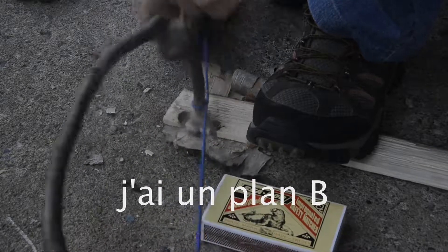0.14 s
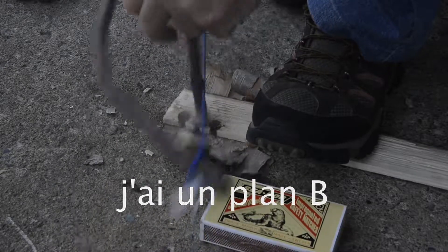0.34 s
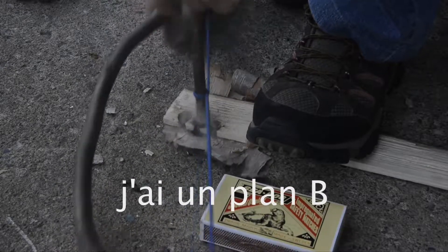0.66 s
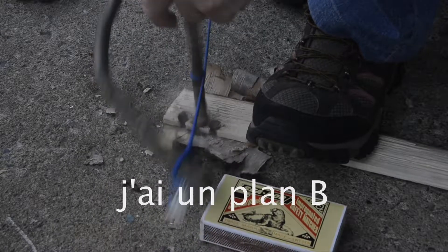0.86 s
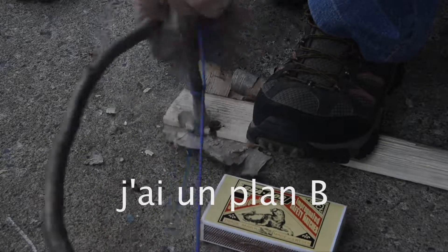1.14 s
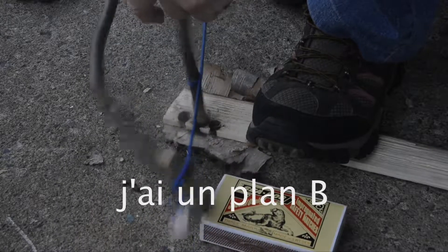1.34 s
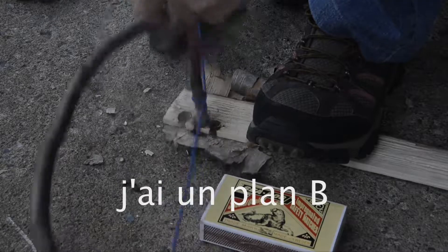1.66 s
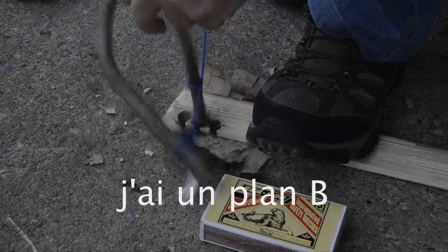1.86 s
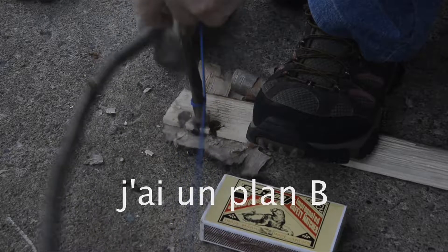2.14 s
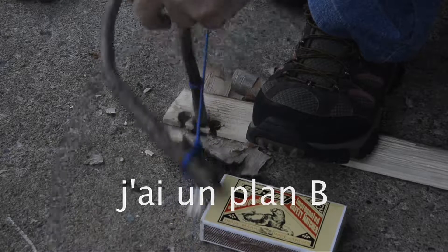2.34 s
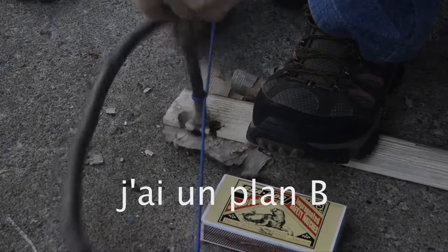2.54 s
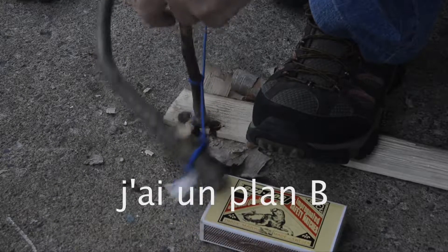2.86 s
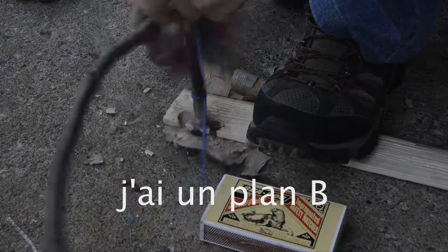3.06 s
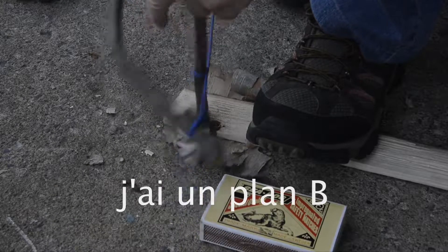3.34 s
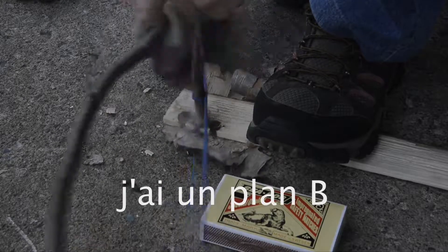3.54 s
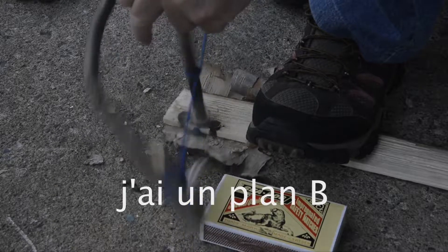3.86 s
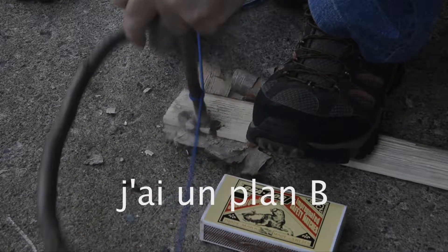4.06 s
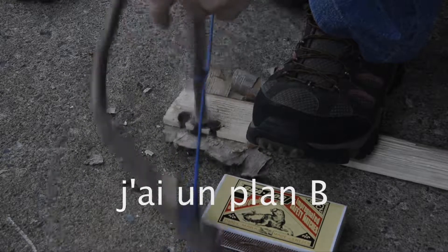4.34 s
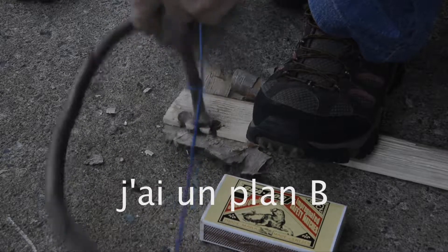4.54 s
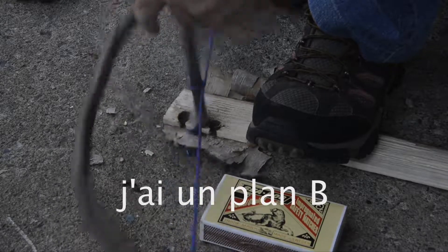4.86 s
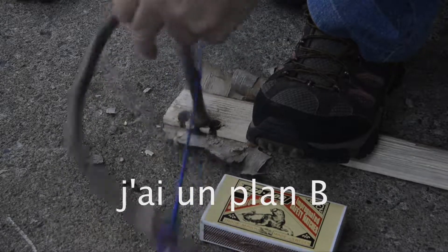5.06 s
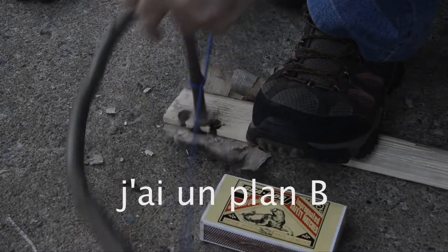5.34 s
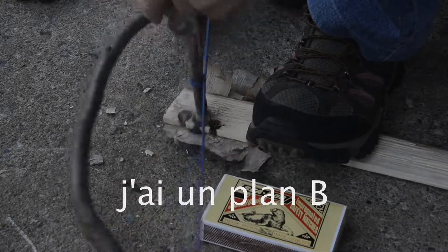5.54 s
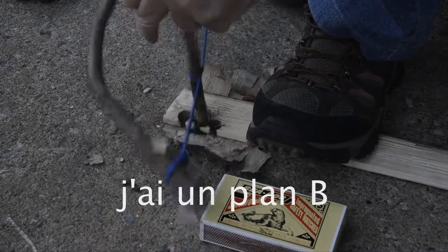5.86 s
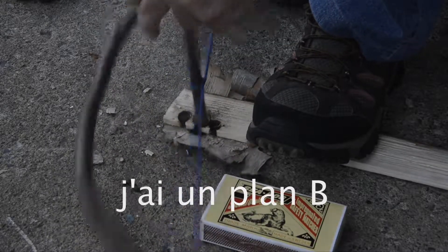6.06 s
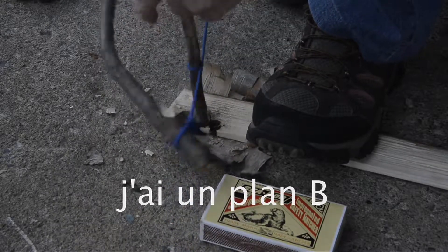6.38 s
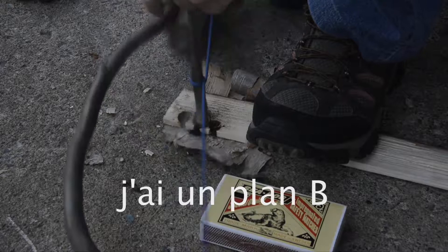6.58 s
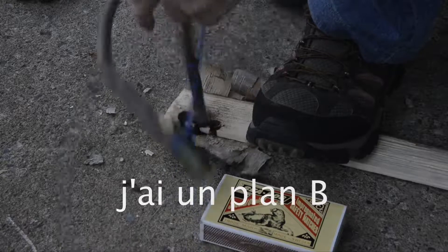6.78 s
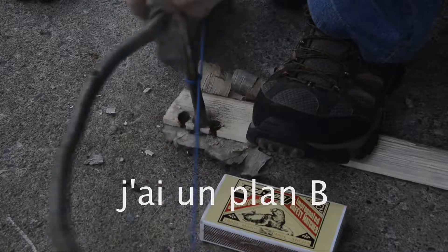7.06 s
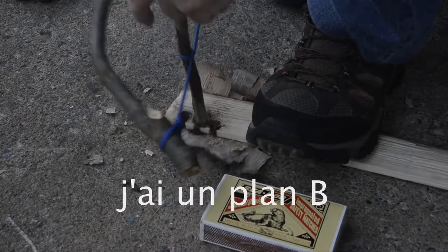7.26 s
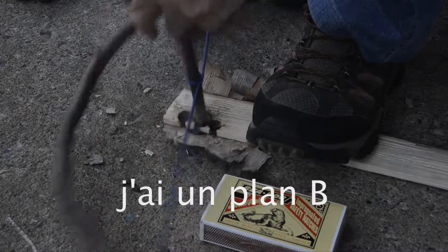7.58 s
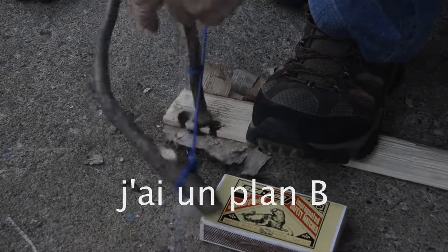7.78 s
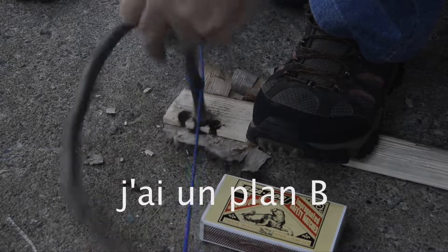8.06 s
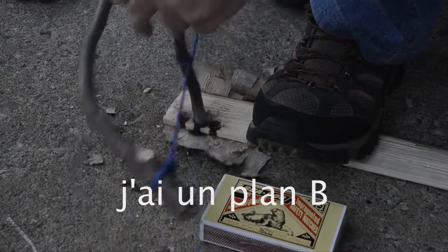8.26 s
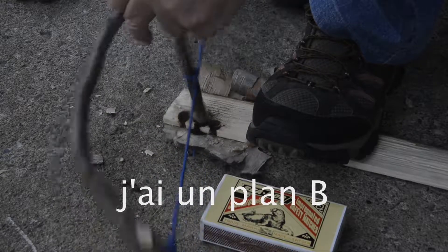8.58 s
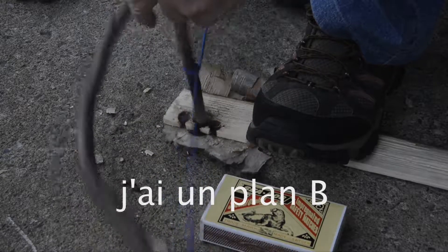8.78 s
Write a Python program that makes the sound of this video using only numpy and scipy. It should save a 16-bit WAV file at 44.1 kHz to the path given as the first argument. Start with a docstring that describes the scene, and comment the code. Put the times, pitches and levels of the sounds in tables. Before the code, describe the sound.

A corded bow spins a wooden spindle in a board, rasping to and fro four times a second, with sharp chattering squeaks at each reversal, outdoors.

```python
"""Bow drill outdoors: smooth noise and low tones lie throughout; a wooden spindle grinds to and fro in a board.
Each reversal breaks loose in chattering noise bursts; many also squeak, a harmonic stack of even slips.
Soft scuffs of filtered grit come now and then as the board shifts; in five strokes the tip sings, a tone
flaring per turn. Past mid-scene the bow knocks the board twice, a sharp jolt and a rattle through the
ground resonances. Gain ducking, rounded peaks and a top cut shape the sum."""
import sys
import numpy as np
from scipy import signal
from scipy.fft import rfft, irfft
from scipy.io import wavfile

SR = 44100
rng = np.random.default_rng(int(sys.argv[2]) if len(sys.argv) > 2 else 0)


def store_pcm(level_fs):
    """Save levels as 16-bit WAV."""
    pcm = np.round(np.clip(level_fs, -1, 1) * 32767).astype(np.int16)
    wavfile.write(sys.argv[1], SR, np.atleast_2d(pcm).T)


N = 393372

# Source levels are nominal: before random swells and record().
# far-noise spectrum: freq_hz, relative_db
OUTDOORS_SPECTRUM = [(25, -31), (60, -5), (2400, -4.5), (3200, -19.5), (6500, -12.5), (16000, -27)]
OUTDOORS_DB = -41   # rms
# low tones: centre_hz, width_hz, level_db (before swell)
HUM = [(59.5, 8.3, -69.5), (79, 5, -60.5), (361.7, 4.6, -66.5)]
# hum gain over time: time_s, gain_db
HUM_SWELL = [(5.3, 5.5), (7.0, 10), (8.1, 10.5), (8.4, -13.5)]
# grind through one stroke, slowing to a halt: stroke_share (0-1), gain_db
STROKE_SHAPE = [(0.02, -12), (.15, -6), (.7, -1.4), (.92, -8.5), (.99, -14.5)]
# bearing pressure, read at stroke starts: time_s, grind_level_db (before push/pull offset and settling)
PRESSURE = [(0, -22), (.15, -30.5), (.4, -34), (.5, -27.5), (3.3, -24.5), (5.17, -28), (5.41, -42),
            (5.57, -31), (5.93, -24), (8.9, -28)]
# spindle and board resonances: centre_hz, width_hz, grind_relative_db, chatter_relative_db
WOOD = [(1150, 320, -12, -14), (2050, 520, -9.5, -8), (2814, 220, -2.5, 0.7), (3521, 296, -3, -0.5),
        (4620, 810, -10.5, -7), (6194, 522, -13, 3), (6920, 1050, -8.5, -19), (8095, 1156, -14, -2),
        (9394, 904, -14.5, -5), (11450, 2520, -21, -6), (15450, 3200, -25, -17)]
# bow reversals, pull and push in turn: start_s, break_loose_ms, level_db, [wait_ms after a short catch]
REVERSALS = [(0.005, 6.2, -33), (0.151, 15, -10, 13), (0.387, 12.3, -13.5, 9.5), (0.510, 5, -47),
             (0.655, 26, -9), (0.912, 13, -20, 21), (1.147, 9.3, -12, 13), (1.402, 13.4, -9, 17),
             (1.597, 40.5, -7.5), (1.888, 10, -14, 12.5), (2.118, 12.3, -10.5, 12.5),
             (2.362, 12, -12.5, 17.5), (2.572, 13, -12.5, 20.5), (2.819, 26, -12.5, 18), (3.045, 25, -11.5),
             (3.297, 25, -10.5), (3.534, 17, -8), (3.772, 14, -14, 15), (4.0, 13.2, -11, 16.5),
             (4.217, 80, -7), (4.474, 16.3, -11, 16), (4.691, 35, -12, 13.5), (4.94, 15.4, -8),
             (5.165, 29, -12.5, 17), (5.414, 13, -17.5), (5.518, 30, -14), (5.577, 38, -12),
             (5.939, 8.7, -17.5), (6.134, 30, -11.5), (6.381, 26.7, -10.5), (6.604, 21.3, -7.5),
             (6.823, 24, -11.5), (7.052, 19.4, -9.5, 11), (7.261, 71, -10.5), (7.489, 18.2, -14.5),
             (7.757, 13.5, -14, 12.5), (7.966, 16.8, -11.5), (8.173, 56, -11.5, 47),
             (8.424, 22.3, -9.5, 13.5), (8.657, 28, -9), (8.894, 22.2, -8.5)]
# regular stick-slip: start_s, length_ms, level_db, slip_rate_hz, overtone_gain_db, [climb_hz by length_ms]
SQUEAKS = [(0.170, 15, -11, 2576, -12), (0.657, 12, -12, 2620, -15), (0.931, 19, -11.5, 3150, -1),
           (1.164, 15, -10, 3136, 22), (1.43, 12.6, -12, 3200, 2, 150), (1.906, 15, -10, 3640, -7),
           (2.142, 15, -6, 3000, 22, -110), (2.385, 18, -14, 3100, 14), (2.573, 15, -7.5, 3534, 3.5, -110),
           (2.604, 27, -13.5, 3470, -2), (3.323, 46, -17.5, 3208, -22), (3.534, 5.2, -6.5, 3100, 13),
           (3.774, 6.4, -12, 3270, 6), (3.795, 17, -13.5, 3790, -0.5), (4.016, 11.3, -8.5, 3170, 1, 197),
           (4.211, 16, -15, 3090, -5.5), (4.473, 9, -9, 3560, 1, -150), (4.748, 17.4, -6.5, 3095, 5),
           (4.958, 12.1, -5, 3245, 2, -150), (5.212, 26, -6.5, 3107, 11, -90),
           (6.132, 13.3, -9.5, 2950, -8), (6.415, 33, -10, 3425, 0), (6.626, 14, -14, 2780, -20),
           (6.851, 25.5, -11.5, 3545, -2.5), (7.056, 7.8, -8.5, 3530, 0), (7.324, 14, -14, 3700, -12),
           (7.504, 18, -9.5, 3395, 8, -220), (7.524, 16, -17.5, 2600, -24), (8.427, 6.87, -9, 3260, 9),
           (8.466, 34, -11, 3047, 0.5, 408), (8.685, 30, -10, 3110, 10.5, 440),
           (8.893, 11.5, -13, 3306, 7, -130)]
# board shifting on the ground: centre_s, width_ms, level_db
SCUFFS = [(0.268, 62, -27.5), (2.08, 66, -26), (3.639, 36, -25), (3.958, 44, -23.5), (5.048, 39, -26.5),
          (7.18, 46, -27), (7.394, 20, -25), (7.468, 16, -25.5), (2.24, 35, -29), (8.081, 62, -27)]
# bow hitting the board: start_s, sharp_part_db
KNOCKS = [(5.287, -20), (5.3118, -7.5)]
# ground resonances under the board: centre_hz, width_hz, relative_db
GROUND = [(253, 115, -8.5), (470, 200, -2), (1005, 213, 4), (1480, 350, 1.5), (2790, 670, 0.5)]
# tip half catching once a turn, mid-stroke: first_catch_s, length_ms, level_db, pitch_hz (before waver)
SONGS = [(0.24, 130, -27, 2650), (4.08, 110, -25, 2750), (6.245, 115, -17, 2820), (6.69, 80, -22, 2750),
         (7.117, 70, -15, 2540)]

TURN_HZ = 43   # nominal; wanders in the grind, steady in the songs
SPIN_LEAD_S = 0.0034   # spindle turns just before it catches
PUSH_DB = 1.6   # push bears harder than PRESSURE, pull softer, before settling
LEAN_DB, LEAN_HZ = 3.0, 3150   # maximum lean; pull favours modes below this pitch, push those above
CATCH_MS, CATCH_DB = 6.7, -0.5   # short catch; level against the break-loose, if no squeak
# gain control: threshold, dB of cut per dB over, smoothing, fall of the held excess
GAIN_FROM_DB, GAIN_SHARE, GAIN_ATTACK_MS, HELD_FALL_DB_PER_S = -20, .22, 15, 70
STOPBAND_HZ = 16100


def from_db(db):
    """Gain of a level in dB."""
    return 10 ** (np.asarray(db) / 20)


def rms_one(x):
    """Scaled to rms 1."""
    return x / np.sqrt(np.mean(x ** 2) + 1e-20)


def lag(x, ms):
    """One-pole smoothing with a time constant."""
    r = np.exp(-1000 / (ms * SR))
    return signal.lfilter([1 - r], [1, -r], x)


def drift(ms):
    """Slow random curve of spread 1, drawn at every 20th sample."""
    noise = rng.standard_normal(N // 20 + 2002)
    slow = lag(lag(noise, ms / 20), ms / 20)[2000:]   # settled part
    return np.interp(np.arange(N) / 20, np.arange(len(slow)), rms_one(slow))


def resonate(x, hz, width_hz):
    """Two-pole resonance, gain 1 on top."""
    r = np.exp(-np.pi * width_hz / SR)
    zeros = np.array([1, 0, -1]) * (1 - r * r) / 2
    poles = [1, -2 * r * np.cos(2 * np.pi * hz / SR), r * r]
    return signal.lfilter(zeros, poles, x)


def grains(per_s, spread_db):
    """Fibres catching at random, of uneven size and sign; rms 1."""
    sizes = from_db(spread_db * np.minimum(rng.exponential(1, N), 4)) * rng.choice([-1, 1], N)
    return rms_one(sizes * (rng.random(N) < per_s / SR))


def body(force, modes, shift_db, shift_ms, count, lean_db=0):
    """Clusters of narrow modes; the wandering contact point changes how much force each gets."""
    # unit noise in, about rms 1 out
    norm = np.sqrt(sum(from_db(2 * db) * width_hz * np.pi / SR for hz, width_hz, db in modes))
    out = np.zeros(N)
    for hz, width_hz, db in modes:
        lean = np.clip(LEAN_HZ / (hz - LEAN_HZ) / 10, -1, 1)
        felt = force * rng.choice([-1, 1], N) * from_db(db + lean_db * lean)
        for k in range(count):
            mode_hz = hz + 2 * width_hz * ((k + .5) / count - .5)
            shifted = felt * from_db(shift_db * drift(shift_ms))
            out += (-1) ** k * resonate(shifted, mode_hz, 1.75 * width_hz / count)
    return out / norm


def gate(start_s, length_ms, rise_ms):
    """Slice of a burst and its flat envelope with a rounded start and end."""
    i = round(start_s * SR)
    t_ms = np.arange(min(round(length_ms * SR / 1000), N - i)) * 1000 / SR
    edge = np.clip(np.minimum(t_ms, length_ms - t_ms) / rise_ms, 0, 1)
    return slice(i, i + len(t_ms)), np.sin(np.pi / 2 * edge)


def outdoors():
    """Spectrally shaped far noise plus low tones: narrow resonances wavering on noise."""
    freq_hz = np.maximum(np.fft.rfftfreq(N, 1 / SR), 1)
    knot_hz, knot_db = np.transpose(OUTDOORS_SPECTRUM)
    colour = from_db(np.interp(np.log(freq_hz), np.log(knot_hz), knot_db))
    air = from_db(OUTDOORS_DB) * rms_one(irfft(rfft(rng.standard_normal(N)) * colour, N))
    tones = np.zeros(N)
    for hz, width_hz, level_db in HUM:
        narrow = resonate(resonate(rng.standard_normal(N), hz, width_hz), hz, width_hz)
        tones += from_db(level_db) * rms_one(narrow)
    swell_db = np.interp(np.arange(N) / SR, *np.transpose(HUM_SWELL))
    return air + tones * from_db(swell_db)


def grind():
    """Rasp level follows the spin speed in each stroke; the uneven tip bears harder once a turn."""
    starts_s = np.array([row[0] for row in REVERSALS]) - SPIN_LEAD_S
    direction = (-1) ** np.arange(len(starts_s))   # pull +1, push -1
    levels_db = np.interp(starts_s, *np.transpose(PRESSURE)) - PUSH_DB * direction
    t_s = np.arange(N) / SR
    progress = np.interp(t_s, np.append(starts_s, starts_s[-1] + .23), np.arange(len(starts_s) + 1))
    stroke = np.minimum(progress.astype(int), len(starts_s) - 1)
    share = progress - stroke
    # strokes start with similar bite; pressure differences grow along them
    level_db = -26 + (levels_db[stroke] + 26) * (0.1 + 1.3 * share)
    level_db += np.interp(share, *np.transpose(STROKE_SHAPE))
    turn = 2 * np.pi * np.cumsum(TURN_HZ * from_db(3.1 * drift(40.2))) / SR
    level_db = lag(level_db + 30, 4) - 30   # smoothing starts from -30 dB
    level_db += 2.0 * np.sin(turn) + 1.5 * drift(12)
    rasp = from_db(level_db) * grains(7000, 2.5)
    lean_db = -LEAN_DB * (-1) ** stroke
    modes = np.array(WOOD)[:, [0, 1, 2]]
    return body(rasp, modes, shift_db=2.4, shift_ms=16, count=3, lean_db=lean_db)


def squeaked(start_s):
    """True if a squeak starts within 5 ms of the reversal."""
    return min(abs(row[0] - start_s) for row in SQUEAKS) < .005


def chatter():
    """Reversals break loose in irregular hard slips, some after a short catch; weaker judder dies away."""
    bursts = []
    for start_s, ms, level_db, *wait_ms in REVERSALS:
        bursts.append((start_s + sum(wait_ms) / 1000, ms, level_db))
        if wait_ms:
            # a squeak softens the catch
            bursts.append((start_s, CATCH_MS, level_db + CATCH_DB - 6 * squeaked(start_s)))
    push = np.zeros(N)
    for start_s, ms, level_db in bursts:
        span, shape = gate(start_s, ms, rise_ms=1.8)
        push[span] = np.maximum(push[span], from_db(level_db) * shape)
    judder = from_db(-4.0) * lag(push, 20.0)
    push = np.maximum(push, judder)
    force = push * from_db(2.4 * drift(3)) * grains(7000, 4.36)
    return body(force, np.array(WOOD)[:, [0, 1, 3]], shift_db=4, shift_ms=9, count=4)


def squeaks():
    """Even slips make a wavering, gritty harmonic stack; long squeaks leave a fainter one lingering."""
    out = np.zeros(N)
    waver = .005 * drift(4) + .005 * drift(.4)
    swell = [from_db(3 * drift(2.5)) for _ in range(5)]
    grit = 1 + .3 * drift(.3)
    for start_s, ms, level_db, hz, overtone_db, *climb_hz in SQUEAKS:
        span, edges = gate(start_s - .001, ms + 70, rise_ms=2.2)
        t_ms = np.arange(len(edges)) * 1000 / SR
        linger = np.clip(ms / 18, 0, 1) ** 3 * from_db(-7 - 0.18 * (t_ms - ms))
        shape = edges * np.clip((ms + 3.5 - t_ms) / 5, np.minimum(linger, 1), 1)
        slip_hz = (hz + sum(climb_hz) * np.minimum(t_ms / ms, 1)) * (1 + waver[span])
        phase = 2 * np.pi * np.cumsum(slip_hz) / SR
        partials = from_db(np.array([-4.5, -4.5, -11, -14.5, -15]) + overtone_db * (np.arange(5) > 0))
        stack = np.zeros(len(edges))
        for k, gain in enumerate(partials):
            # overtones fade faster as the grip weakens
            fade = swell[k][span] * shape ** (1 + 0.5 * k)
            stack += gain * fade * np.cos((k + 1) * phase + 1.69 * k)
        out[span] += from_db(level_db) * stack * grit[span] * np.sqrt(2 / np.sum(partials ** 2))
    return out


def scuffs():
    """Grit under the board in soft swells; a knock jolts it sharply and rattles out."""
    t_s = np.arange(N) / SR
    push = np.zeros(N)
    for centre_s, width_ms, level_db in SCUFFS:
        push += from_db(level_db) * np.exp(-2 * (1000 * (t_s - centre_s) / width_ms) ** 2)
    for start_s, level_db in KNOCKS:
        after_ms = 1000 * np.maximum(t_s - start_s, 0)
        jolt_and_rattle = np.exp(-after_ms / 2.0) + 0.35 * np.exp(-after_ms / 18)
        push += (t_s > start_s) * from_db(level_db) * jolt_and_rattle
    return body(push * grains(6000, 2.5), GROUND, shift_db=2.5, shift_ms=8, count=2)


def songs():
    """The half-catching tip makes a wavering sine that flares once per nominal turn."""
    out = np.zeros(N)
    waver = .04 * drift(18) + .015 * drift(1.4)
    swell = from_db(2.5 * drift(5))
    for first_s, ms, level_db, hz in SONGS:
        span, edges = gate(first_s - .5 / TURN_HZ, ms, rise_ms=10)
        t_s = np.arange(len(edges)) / SR
        flare = from_db(level_db - 18 * np.cos(np.pi * TURN_HZ * t_s) ** 2)
        phase = 2 * np.pi * np.cumsum(hz * (1 + waver[span])) / SR
        out[span] += edges * flare * swell[span] * np.sin(phase)
    return out


def scene():
    """All sources summed to one channel."""
    return (outdoors() + grind() + chatter() + squeaks() + scuffs() + songs())[None]


def record(dry):
    """Gain ducks under loud bursts and creeps back, peaks overload the input, then the top is cut."""
    over_db = np.maximum(10 * np.log10(lag(dry ** 2, 4) + 1e-12) - GAIN_FROM_DB, 0)
    fall_db = HELD_FALL_DB_PER_S * np.arange(N) / SR
    held_db = np.maximum.accumulate(over_db + fall_db, axis=1) - fall_db
    ducked = dry * from_db(1.2 - GAIN_SHARE * lag(held_db, GAIN_ATTACK_MS))
    ceiling = .93
    rounded = ducked / (1 + (np.abs(ducked) / ceiling) ** 6) ** (1 / 6)
    top_cut = signal.cheby2(18, 70, STOPBAND_HZ, fs=SR, output="sos")
    return signal.sosfilt(top_cut, rounded)


dry = scene()
out = record(dry)
store_pcm(out)
```